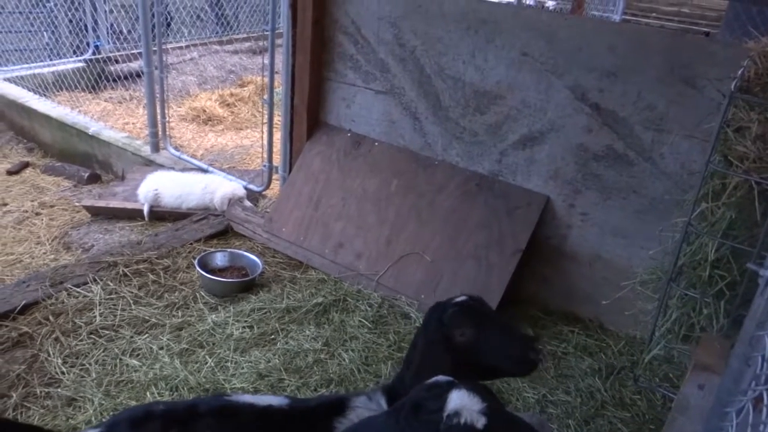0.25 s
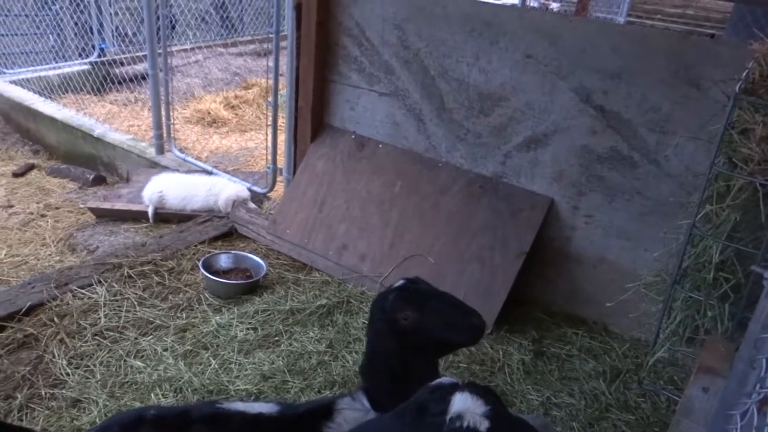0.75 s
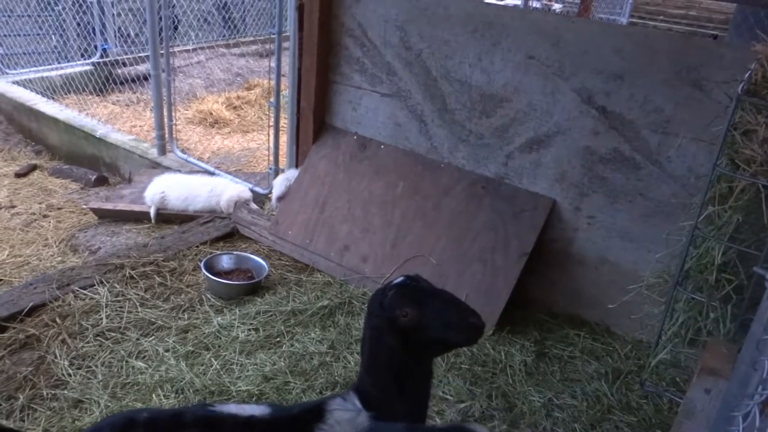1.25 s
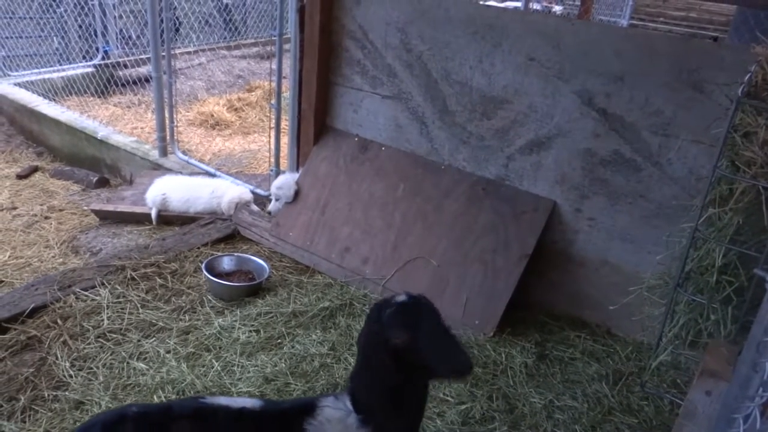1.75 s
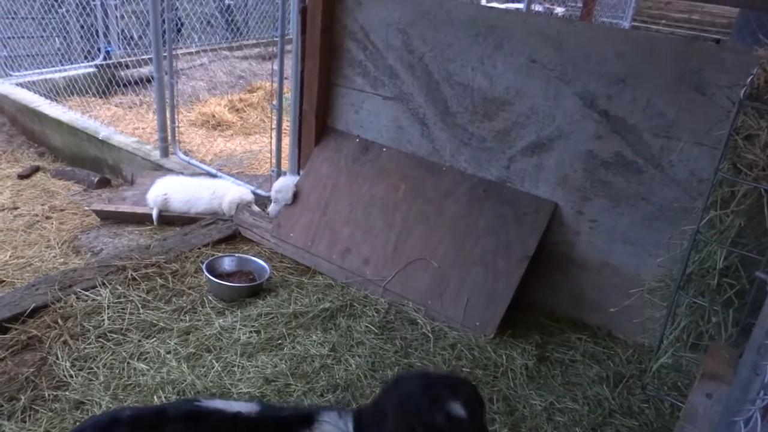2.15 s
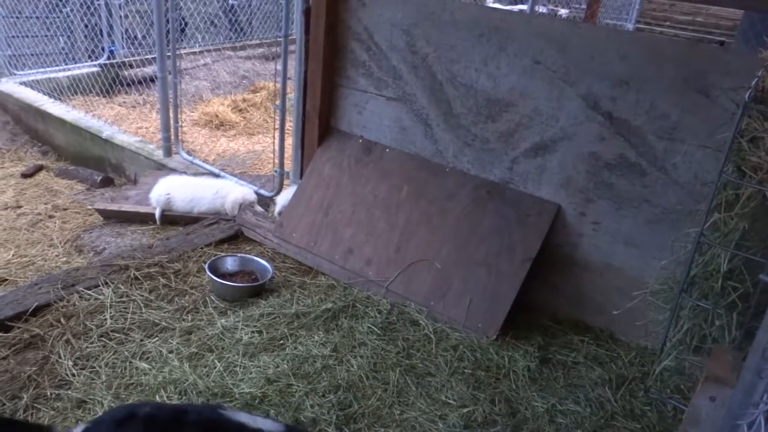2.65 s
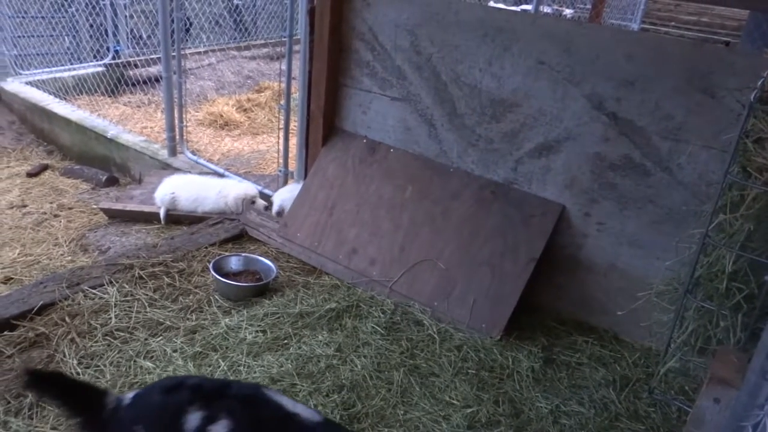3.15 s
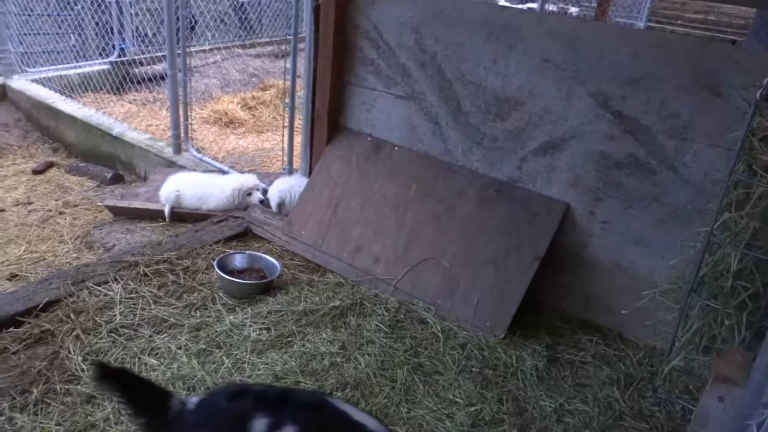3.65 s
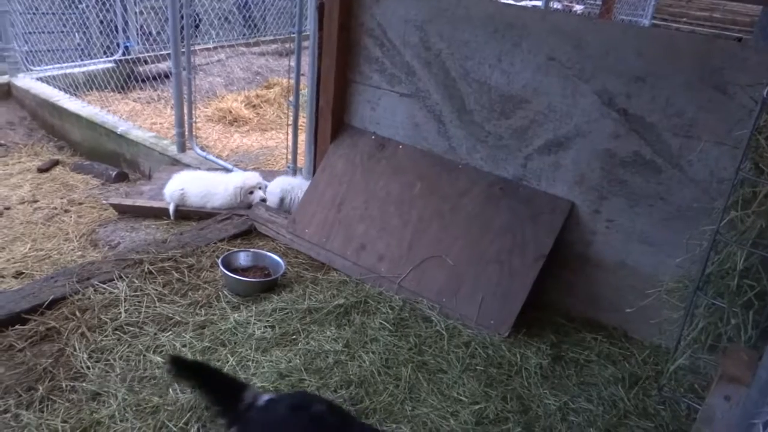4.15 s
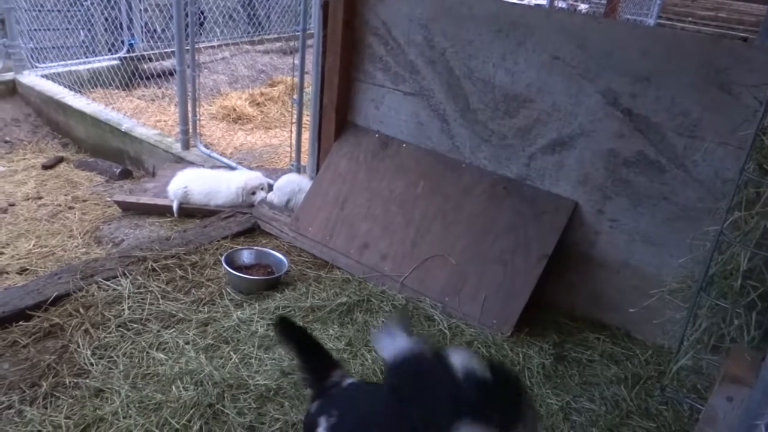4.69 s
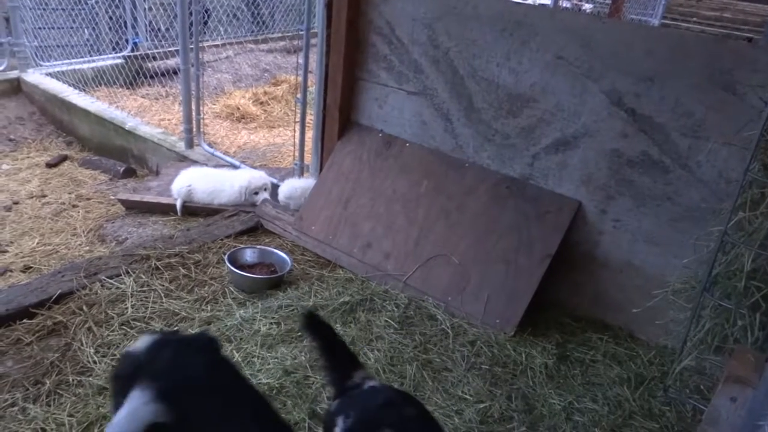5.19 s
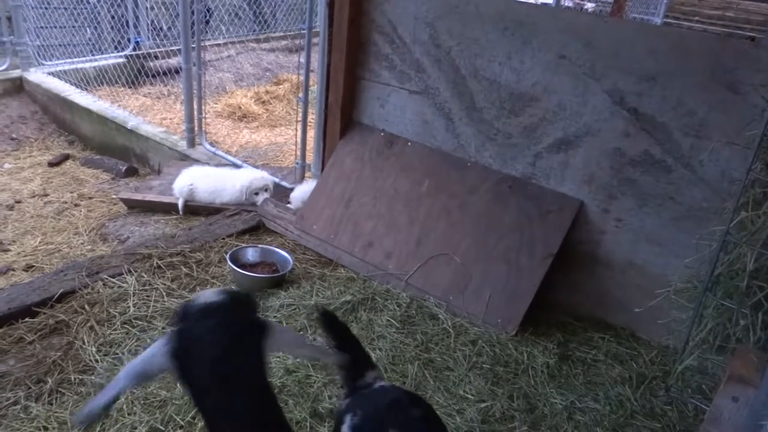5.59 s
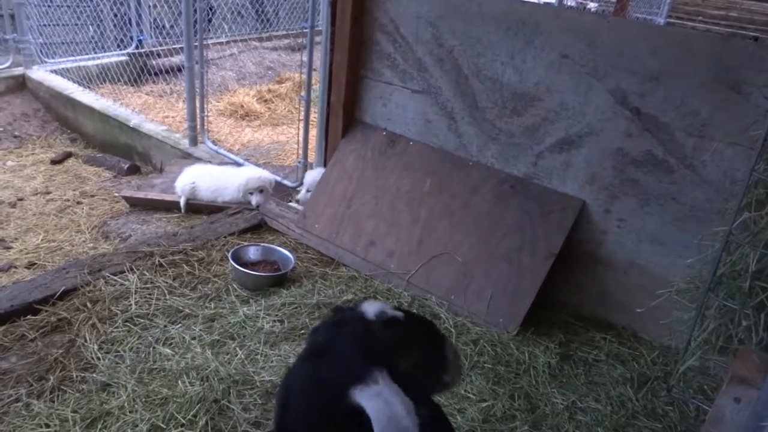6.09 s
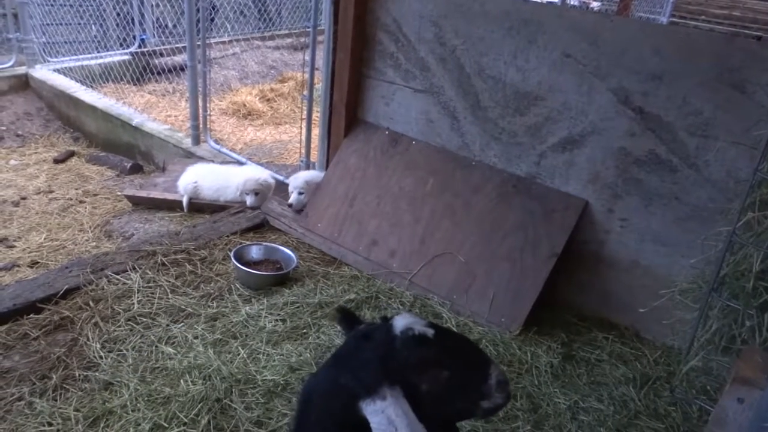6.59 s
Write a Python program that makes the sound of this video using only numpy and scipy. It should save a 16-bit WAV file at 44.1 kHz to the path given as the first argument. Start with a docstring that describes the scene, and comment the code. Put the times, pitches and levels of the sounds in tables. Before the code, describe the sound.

A dog woofs low, barks roughly in two bouts with hoarse huffs between, then a young animal cries thinly over straw rustling in a barn pen.

```python
"""First straw rustles softly over a low rumble in a barn pen; then a dog gives a low woof, three rough barks,
two hoarse huffs and two more barks: a clear tone, with pulses and puffs of air rasping in throat and mouth.
A young animal answers with one long, thin cry, a stack of harmonics that cracks and drops to a lower register.
Goats shuffle close by: snapping stalks make the straw, dull bursts the hooves, ringing modes the knocks
on the pen. Barn and yard echo the voices, and filtered noise makes the air and its rumble."""
import sys
import numpy as np
from scipy import signal
from scipy.fft import rfft, irfft, next_fast_len
from scipy.io import wavfile
from scipy.ndimage import uniform_filter1d

SR = 44100
rng = np.random.default_rng(int(sys.argv[2]) if len(sys.argv) > 2 else 0)


def materialize(psi):
    """Save the field psi as 16-bit PCM at rate SR to the path in sys.argv[1].

    A 1-D psi becomes a single channel; in a 2-D psi each row is a channel.
    """
    bounded = np.clip(np.atleast_2d(psi).T, -1, 1)
    quanta = np.round(bounded * 32767).astype(np.int16)
    wavfile.write(sys.argv[1], SR, quanta)


N = 301203
TIME = np.arange(N) / SR
CUTOFF_HZ = 11050  # top of the whole sound

# The main resonance of the dog's muzzle, and the higher one that honks as the jaws close
MUZZLE_HZ, MUZZLE_WIDTH_HZ = 434.7, 48
HONK_HZ, HONK_WIDTH_HZ = 620, 66

# Resonances of the dog's throat, mouth and teeth, levels relative: f/Hz, width/Hz, level/dB
THROAT = [(590, 9.7, -18.5), (634, 112, 6), (778.5, 50, 0.5), (1018, 33, -5.5), (1150, 66, -1.5),
          (1286, 20, -12)]
MOUTH = [(1446, 450, -0.5), (1785, 72, -0.5), (1828, 45, 4.5), (2126, 225, -6), (2432, 66, -7.5),
         (3400, 160, -15.5)]
TEETH = [(4626, 160, 0), (4860, 220, 3), (6150, 2600, -4), (7360, 670, -3.5)]


def dog(shimmer_db=5.5, rasp=5.8, gravel_db=-11, gravel_width_hz=95):
    """A clear tone over the chest note; uneven pulses and puffs of air rasp in throat and mouth."""
    pitch, chest_gain, tone_gain, throat_gain, honk_gain, mouth_gain = barking()
    jitter, rough, flutter_db = .025, 1.4, 2.5
    cycles = np.cumsum(pitch * (1 + jitter * drift(300))) / SR
    new_cycle = np.diff(np.floor(cycles), prepend=0)
    pulses = rms_one(new_cycle * from_db(shimmer_db * drift(300)))
    puffs = rms_one(rng.standard_normal(N) * (1 + np.cos(2 * np.pi * cycles)))
    # slack folds, at a low pitch or at little effort, flap more loosely than taut ones
    looseness = np.clip(210 / pitch, 1, 2) ** 2 + 2.4 / (1 + (tone_gain / from_db(-23.5)) ** 2)

    chest = chest_gain * np.sqrt(2) * np.sin(2 * np.pi * cycles) * from_db(3.5 * drift(90))
    gravel = resonate(puffs, [(MUZZLE_HZ, gravel_width_hz, 0)])
    gravel = even(butter(gravel, [310, 590], "band"))
    tone = barking_tone(pitch, cycles) + from_db(gravel_db) * looseness * gravel
    tone = tone_gain * even(tone, size=500)

    throat = resonate(pulses + rough * looseness * puffs, THROAT)
    throat = butter(butter(throat, [460, 1500], "band"), [460, 1500], "band")
    honk = resonate(pulses + puffs, [(HONK_HZ, HONK_WIDTH_HZ, 0)])
    honk = butter(honk, [520, 900], "band")
    throat = throat_gain * even(throat) + honk_gain * even(honk)

    # lips and tongue flap, so each resonance of the mouth swells and fades on its own
    hoarse = pulses + rasp * puffs
    mouth = 0
    for k, mode in enumerate(MOUTH):
        mouth = mouth + (-1) ** k * resonate(hoarse, [mode]) * from_db(flutter_db * drift(40))
    mouth = even(butter(mouth, [1200, 3300], "band"))
    teeth = even(butter(resonate(hoarse, TEETH), [3800, 8500], "band"))
    bright = mouth_gain * (mouth + from_db(-13.5) * teeth)
    return (pan(from_db(-5.5) * chest + from_db(2.1) * tone, db=-2.0)
            + pan(from_db(-3.0) * throat, db=-1.4) + pan(bright, db=-4.5))


def barking_tone(pitch, cycles, count=4):
    """The clear core of a bark: a harmonic sings out only while it passes the muzzle resonance."""
    orders = np.arange(2, count + 1)[:, None]
    gains = 1 / np.sqrt(1 + (2 * (orders * pitch - MUZZLE_HZ) / MUZZLE_WIDTH_HZ) ** 2)
    return np.sqrt(2) * np.sum(gains * np.sin(2 * np.pi * orders * cycles), axis=0)


# Every bark starts on slack folds, low and rising, then breaks up to its pitch
SLACK_HZ, SLACK_RISE_HZ_PER_S, BREAK_S = 131.87, 330, .026
# The tone takes the slack loss once when taut and twice when slack, and dips during the break
BARK_ATTACK_S, SLACK_DB, BREAK_DIP_DB = 0.046, -2, -7.5
# The tone collapses after the push and leaves a weaker tail
COLLAPSE_DB_PER_S, TAIL_DB, TAIL_DB_PER_S = 802.5, -8.5, 130
THROAT_FALL_DB_PER_S = 146
# The mouth closes from the break on; the second rate is added after the push
MOUTH_CLOSE_DB_PER_S, MOUTH_FALL_DB_PER_S = 88, 80
# The honk starts just before the tone collapses; its level is relative to the throat
HONK_DB, HONK_LEAD_S, HONK_HOLD_S = 2.5, .006, 0.03
HONK_ATTACK_S, HONK_FALL_DB_PER_S = .006, 280
# Without a push behind it the pitch wavers: share of the pitch, and changes a second
WAVER, WAVER_PER_S = .05, 35
GROWL_ATTACK_S, GROWL_FALL_DB_PER_S = 0.018, 206
# Against the growl's chest note: its own loss during a push, and the growl's tone and rasp
CHEST_LOSS_DB, GROWL_TONE_DB, GROWL_RASP_DB = -18, 1.5, -5.5

# A soft woof and five barks, levels before mixing: start t/s, slack onset lasts t/s, push lasts t/s,
# pitch f/Hz, sag after the push/(Hz/s), chest level/dB, tone level/dB, throat level/dB, mouth level/dB
BARKS = [(.468, .055, .13, 220.1, 601.9, -41.5, -38, -62, -58),
         (2.069, .065, .132, 217.3, 253, -49, -15, -22, -31),
         (2.293, .07, 0.13, 213.6, 150.6, -64, -13, -21.5, -34.5),
         (2.578, .068, .16, 216.7, 479.3, -53, -13, -24, -35.5),
         (4.103, .065, .127, 211.3, 119.8, -68, -12.5, -26, -37.5),
         (4.38, .072, 0.14, 207.6, 106, -46.5, -14.5, -26.5, -44.5)]
# The dog growls on under each bout, levels before mixing: start t/s, length t/s, chest level/dB
GROWLS = [(.49, 0.16, -52.5), (2.07, 0.76, -44), (4.11, 0.65, -44.5)]


def barking():
    """Pitch and gains of chest, tone, throat, honk and mouth: each bark is a gesture on top of the growl."""
    growl, = gestures(GROWLS, GROWL_ATTACK_S, GROWL_FALL_DB_PER_S)
    pitch, chest = np.full(N, float(SLACK_HZ)), growl
    tone, throat = from_db(GROWL_TONE_DB) * growl, from_db(GROWL_RASP_DB) * growl
    pushing, honk, mouth = 0, 0, 0
    for start, slack_s, push_s, hz, sag_hz_per_s, chest_db, tone_db, throat_db, mouth_db in BARKS:
        age = TIME - start
        after = np.maximum(age - push_s, 0)
        taut = np.clip((age - slack_s) / BREAK_S + .5, 0, 1)
        slack_pitch = SLACK_HZ + SLACK_RISE_HZ_PER_S * age
        taut_pitch = np.maximum(hz - sag_hz_per_s * after, SLACK_HZ)
        pitch = np.where(age >= 0, (1 - taut) * slack_pitch + taut * taut_pitch, pitch)

        push = swell(start, push_s, BARK_ATTACK_S, COLLAPSE_DB_PER_S)
        tail = from_db(TAIL_DB) * swell(start, push_s, BARK_ATTACK_S, TAIL_DB_PER_S)
        pushing = pushing + push
        chest = np.hypot(chest * from_db(CHEST_LOSS_DB * push), from_db(chest_db) * push * taut)
        core_db = tone_db + SLACK_DB * (2 - taut) + BREAK_DIP_DB * np.sin(np.pi * taut)
        tone = np.hypot(tone, from_db(core_db) * np.maximum(push, tail))
        throat_swell = swell(start, push_s, BARK_ATTACK_S, THROAT_FALL_DB_PER_S)
        throat = np.hypot(throat, from_db(throat_db) * throat_swell)
        honk_swell = swell(start + push_s - HONK_LEAD_S, HONK_HOLD_S, HONK_ATTACK_S, HONK_FALL_DB_PER_S)
        honk = honk + from_db(throat_db + HONK_DB) * honk_swell
        mouth_swell = swell(start, slack_s, BARK_ATTACK_S, MOUTH_CLOSE_DB_PER_S)
        mouth = mouth + from_db(mouth_db - MOUTH_FALL_DB_PER_S * after) * mouth_swell
    waver = WAVER * np.maximum(1 - pushing, 0) * drift(WAVER_PER_S)
    return pitch * (1 + waver), chest, tone, throat, honk, mouth


HUFF_ATTACK_S, HUFF_FALL_DB_PER_S = 0.049, 195
# The dog's huffs, levels before mixing: start t/s, length t/s, level/dB
HUFFS = [(2.96, 0.19, -43), (3.34, 0.066, -48)]
# Their colour, relative: f/Hz, level/dB per Hz
HUFF_COLOUR = [(290, 7.5), (500, -2.5), (575, -1), (692, -11), (759, 0), (1100, -1), (1470, -4.5),
               (1830, 0.5), (3470, -13), (3850, -19.5), (8000, -14.5), (10400, -41), (17600, -120)]


def huff():
    """Air forced through the dog's open mouth, with no voice."""
    gain, = gestures(HUFFS, HUFF_ATTACK_S, HUFF_FALL_DB_PER_S)
    return from_db(1.0) * gain * hiss(HUFF_COLOUR) * from_db(1.62 * drift(90))


CRY_MAIN_HZ = 1070  # main resonance
CRY_RASP, CRY_DOUBLING = 0.08, .25  # steady rasp 0-1; period doubling per unit of rasp
# The melody of the cry in its two registers: t/s, pitch f/Hz
CRY_HIGH = [(4.8, 556), (4.878, 670.3), (4.962, 723.3), (5.026, 739), (5.124, 709), (5.2, 708.3),
            (5.225, 703)]
CRY_LOW = [(5.23, 614), (5.242, 581), (5.262, 549.6), (5.44, 515.4), (5.5, 521), (5.56, 540.7),
           (5.704, 532.1), (5.818, 538.7), (5.968, 531.7), (6.09, 507.7), (6.154, 442), (6.176, 435),
           (6.19, 407.1)]
# Effort of the cry, before mixing: t/s, level/dB
CRY_EFFORT = [(4.801, -52.5), (4.95, -48), (5.1, -44.5), (5.25, -37.5), (5.45, -38.5), (5.898, -36.5),
              (6.02, -44), (6.1, -40.5), (6.19, -57)]
# The mouth opens and closes again: t/s, treble an octave above the main resonance level/dB
CRY_MOUTH = [(4.8, -11), (4.92, 4), (5.49, -1), (5.6, -10.5), (6.0, -12), (6.19, -11.5)]
# The young animal's throat, relative: f/Hz, level/dB
CRY_THROAT = [(530, -8), (715, 2), (900, -1), (1070, 3.5), (1250, -7.5), (1430, -1.5), (1600, -1),
              (2140, 2), (2630, -5.5), (2880, -3), (3200, -11.5), (3500, -12), (3700, -20), (3950, -10),
              (4400, -22.5), (5000, -28)]
# Standing waves between the walls swallow or lift a harmonic gliding through: f/Hz, width/Hz, level/dB
STANDING_WAVES = [(1041, 8.7, -17.5), (2080, 10.5, 8)]
# The cry cracks: t/s, half length t/s, added rasp 0-1
CRACKS = [(5.101, 0.039, 0.65), (5.193, 0.023, 0.3), (5.234, 0.015, 0.68), (6.15, 0.049, 0.43)]


def cry(melody, jitter=0.0026, rasp_jitter=0.018, waver_db=2.6, count=8):
    """A nearly pure voice, brighter as the mouth opens; in a crack it screeches and alternate cycles weaken."""
    span = during(melody) > 0
    pitch, effort_db, mouth_db = (in_time(rows)[0][span] for rows in (melody, CRY_EFFORT, CRY_MOUTH))
    rasp = CRY_RASP
    for s, half_s, depth in CRACKS:
        rasp = rasp + depth * np.exp(-((TIME[span] - s) / half_s) ** 2)
    unsteady_pitch = pitch * (1 + (jitter + rasp_jitter * rasp) * drift(350)[span])
    phase = 2 * np.pi * np.cumsum(unsteady_pitch) / SR

    voice = 0
    for k in range(1, count + 1):
        hz = k * pitch
        opening_db = mouth_db * np.sqrt(np.maximum(np.log2(hz / CRY_MAIN_HZ), 0))
        walls_db = sum(db / (1 + ((hz - centre) / width) ** 2) for centre, width, db in STANDING_WAVES)
        level_db = at_hz(CRY_THROAT, hz) + opening_db + walls_db + waver_db * drift(25)[span]
        voice = voice + np.sqrt(2) * from_db(level_db) * np.sin(k * phase)
    # half the pitch makes every second cycle weaker
    voice = voice * (1 + CRY_DOUBLING * rasp * np.sin(phase / 2))
    voice = voice * (1 + .5 * rasp * drift(700)[span])
    screech = rms_one(butter(rng.standard_normal(len(pitch)), [1700, 3100], "band"))
    screech = from_db(mouth_db) * rasp * screech
    out = np.zeros(N)
    out[span] = from_db(effort_db) * (voice + screech)
    return during(melody) * out


STRIDE_ATTACK_S, STRIDE_FALL_DB_PER_S = .035, 165
SHUFFLE_SWING_DB, SHUFFLE_PER_S, SHUFFLE_CRUSH_DB = 1.2, 14, -3
# Legs sweep through the straw, before mixing: start t/s, length t/s, brushing level/dB, crushing level/dB
STRIDES = [(.08, 0.035, -61, -76), (.28, 0.023, -59, -60), (.48, 0.085, -55, -61), (.68, 0.091, -56, -60),
           (.8, 0.12, -45, -52), (.98, .32, -52, -59.5), (1.53, 0.049, -50.5, -63), (1.85, 0.15, -59, -88),
           (2.0, .07, -52, -66), (2.09, 0.064, -46, -52), (2.3, .06, -53, -65), (2.58, 0.081, -55, -80),
           (3.2, 0.094, -60.5, -56.5), (3.52, 0.11, -58, -66), (3.85, 0.053, -51, -50.5),
           (3.96, 0.068, -52, -47.5), (4.14, 0.17, -57.5, -79), (4.45, 0.11, -52, -61),
           (4.8, 0.086, -60, -71), (5.14, 0.061, -51.5, -70), (5.37, 0.12, -50.5, -71),
           (5.73, 0.06, -57.5, -61), (6.17, 0.084, -50, -60), (6.31, 0.15, -56, -80),
           (6.48, 0.11, -53, -67), (6.68, 0.052, -57, -59)]
# Small shuffling between the strides, before mixing: t/s, level/dB
SHUFFLE = [(0, -69), (1.3, -55.5), (1.75, -72), (2.3, -63.5), (3.6, -59.5), (5.5, -60.5), (5.95, -66),
           (6.5, -53.5), (6.83, -68)]
# Colours of brushing and crushing, relative: f/Hz, level/dB per Hz
SWISH_COLOUR = [(1500, -21), (3000, -12.5), (5000, -10.5), (7000, -6), (8600, -3), (9600, -7.5),
                (11000, -18)]
CRUSH_COLOUR = [(150, -24.5), (280, 3), (600, 15), (1300, 7), (2200, 8.5), (3400, 6), (5000, 8.5),
                (7000, -3.5), (10000, -1.5)]


def straw():
    """Light brushing is thin and high; a hoof's weight crushes the stalks with a fuller sound."""
    brushing, crushing = gestures(STRIDES, STRIDE_ATTACK_S, STRIDE_FALL_DB_PER_S)
    shuffle = from_db(in_time(SHUFFLE)[0] + SHUFFLE_SWING_DB * drift(SHUFFLE_PER_S))
    swish = np.hypot(brushing, shuffle)
    crush = np.hypot(crushing, from_db(SHUFFLE_CRUSH_DB) * shuffle)
    thin = crackle(SWISH_COLOUR, per_s=4000, spread_db=2.2, smooth=1.0)
    full = crackle(CRUSH_COLOUR, per_s=2500, spread_db=2.2, smooth=1.0)
    return from_db(2.0) * swish * thin + from_db(1.0) * crush * full


# Hooves on the bedding, peaks before mixing: t/s, level/dB, thud f/Hz
STEPS = [(0.757, -39.5, 623), (0.807, -37, 301), (.85, -47, 332), (0.926, -43.5, 260), (1.082, -48.5, 262),
         (2.013, -43.5, 376.3), (6.33, -50.5, 148)]


def hooves():
    """Each step is a dull thud in the bedding: a burst of noise through one broad resonance."""
    out = 0
    for s, db, hz in STEPS:
        thud = butter(resonate(burst(s, decay_s=0.087), [(hz, 130, 0)]), 1700, "low")
        out = out + from_db(db) * thud / np.abs(thud).max()
    return out


# Knocks against the pen, before a 4 dB lift: t/s, level/dB
KNOCKS = [(3.871, -49.5), (4.006, -36.5), (6.748, -54)]
# The pen's modes, levels relative: f/Hz, level/dB, ring setting t/s
# (the setting is held to 0.05-0.5 s; a mode takes about 3.6 times as long to fall by 60 dB)
PEN = [(590, -1.5, .4), (1260, -10, 0.15), (1316, -14, 0.04), (1772.7, -19, 0.08), (2140, -27, 0.063),
       (2670, -27, 0.16), (3025, -22, 0.04)]


def knocks(scuff_db=-9):
    """A scuffing contact sets the modes of the pen ringing."""
    modes = [(hz, 0.61 / np.clip(ring_s, .05, .5), level) for hz, level, ring_s in PEN]
    out = 0
    for s, db in KNOCKS:
        ring = resonate(burst(s, decay_s=0.0053), modes)
        scuff = butter(burst(s, decay_s=0.025), [450, 2600], "band")
        knock = ring / np.abs(ring).max() + from_db(scuff_db) * scuff / np.abs(scuff).max()
        out = out + from_db(db + 4.0) * knock
    return out


# How fast the barn's echo dies: f/Hz, time to fall by 60 dB t/s
BARN_T60 = [(150, 0.48), (450, 0.089), (1200, 0.24), (3000, 0.41), (9000, 0.2)]


def barn(barks, young):
    """Both voices ring in the barn."""
    sent = from_db(-6.5) * barks.mean(axis=0) + from_db(-11) * young
    return reverb(sent, BARN_T60, width=0.39, onset_s=0.0052)


# How fast the yard's echo dies: f/Hz, time to fall by 60 dB t/s
YARD_T60 = [(150, 1.1), (450, 2.07), (1200, 4.8), (3000, 0.22), (9000, .2)]


def yard(barks):
    """The barks echo, late and faint, across the yard."""
    return reverb(from_db(-23.5) * barks.mean(axis=0), YARD_T60, width=0.083, onset_s=0.062)


AIR_DB, RUMBLE_SWING_DB = -57.5, 4.5
# Colours of the yard's air and of the low rumble, relative: f/Hz, level/dB per Hz
AIR_COLOUR = [(15, -28), (25, -5.5), (59, -8.5), (121, -2.5), (192, -11.5), (247, -0.5), (288, -3),
              (559, -9), (759, -11.5), (1470, -23), (5820, -26), (7900, -17), (11000, -50.5), (14300, -42),
              (22000, -120)]
RUMBLE_COLOUR = [(25, -12), (60, -10.5), (120, -4), (200, -4), (400, -24.5)]
# Low rumble, before its slow swing: t/s, level/dB
RUMBLE = [(0, -64.5), (1.6, -65.5), (2.8, -55.5), (3.4, -57), (3.95, -62.5), (4.65, -47.5), (5.0, -66),
          (6.83, -58.5)]


def air():
    """Steady noise is the air of the yard; low noise that slowly swells and fades is the rumble."""
    rumble_db = in_time(RUMBLE)[0] + RUMBLE_SWING_DB * drift(1.8)
    return from_db(AIR_DB) * hiss(AIR_COLOUR) + from_db(rumble_db) * hiss(RUMBLE_COLOUR)


def from_db(db):
    """Decibels to gain."""
    return 10 ** (np.asarray(db) / 20)


def rms_one(x):
    """Scale to rms 1."""
    return x / np.sqrt(np.mean(x ** 2) + 1e-20)


def in_time(rows):
    """Each column of a curve, sample by sample."""
    s, *columns = np.transpose(rows)
    return [np.interp(TIME, s, c) for c in columns]


def during(rows, fade=0.005):
    """1 while a curve lasts, with short fades."""
    return np.clip(np.minimum(TIME - rows[0][0], rows[-1][0] - TIME) / fade + .5, 0, 1)


def at_hz(points, hz):
    """Read a spectrum on a log-frequency axis."""
    f, value = np.transpose(points)
    return np.interp(np.log(np.maximum(hz, 1)), np.log(f), value)


def butter(x, hz, kind):
    """Second-order Butterworth filter."""
    return signal.sosfilt(signal.butter(2, hz, kind, fs=SR, output="sos"), x + 1e-18)


def drift(rate):
    """Smooth chance of spread 1 that changes about rate times a second."""
    knots = rng.standard_normal(20000)
    return rms_one(np.interp(TIME * rate, np.arange(len(knots)), knots))


def swell(start, length, attack_s, fall_db_per_s):
    """Gain of one gesture: it rises, holds to the end of its length and dies away."""
    age = TIME - start
    fall_db = np.clip(fall_db_per_s * (age - length), 0, 200)
    return np.clip(age / attack_s, 0, 1) ** 2 * from_db(-fall_db)


def gestures(rows, attack_s, fall_db_per_s):
    """Gain of each dB column over a table of (start, length, dB, ..) gestures of one shape."""
    power = 0
    for s, length, *dbs in rows:
        power = power + (from_db(dbs)[:, None] * swell(s, length, attack_s, fall_db_per_s)) ** 2
    return np.sqrt(power)


def burst(s, decay_s):
    """A short rush of contact noise."""
    age = np.maximum(TIME - s, 0)
    return rng.standard_normal(N) * (1 - np.exp(-age / 0.00074)) * np.exp(-age / decay_s)


def resonate(x, modes):
    """Parallel resonances (Hz, width, dB) with alternating signs."""
    out = 0
    for k, (hz, width, db) in enumerate(modes):
        r = np.exp(-np.pi * width / SR)
        poles = [1, -2 * r * np.cos(2 * np.pi * hz / SR), r * r]
        ring = signal.lfilter([1, 0, -1], poles, x + 1e-18) * (1 - r * r) / 2
        out = out + (-1) ** k * from_db(db) * ring
    return out


def even(x, size=900):
    """Hold the short-time rms at 1."""
    power = uniform_filter1d(uniform_filter1d(x * x, size), size)
    return x / np.sqrt(np.maximum(power, 1e-14))


def pan(x, db):
    """Place a sound with the given left-right difference."""
    return x * from_db([[db / 2], [-db / 2]])


# How alike left and right are: f/Hz, likeness 0-1 (held to 0.99 at most)
LIKENESS = [(40, 1), (300, 0.86), (1000, 0.39), (3000, 0.69), (8000, 0.86), (11000, .7)]


def coloured(mid, side, colour):
    """Give two unrelated signals a spectrum and mix them to left and right; rms 1."""
    size = next_fast_len(N)
    hz = np.fft.rfftfreq(size, 1 / SR)
    alike = np.clip(at_hz(LIKENESS, hz), 0, .99)
    low_cut = np.minimum(hz / colour[0][0], 1) ** 2
    gain = from_db(at_hz(colour, hz)) * (hz < CUTOFF_HZ) * low_cut
    both = np.sqrt(1 + alike) * rfft(mid, size) + np.sqrt(1 - alike) * rfft(side, size) * [[1], [-1]]
    return rms_one(irfft(gain * both, size)[:, :N])


def hiss(colour):
    """Smooth stereo noise."""
    return coloured(*rng.standard_normal((2, N)), colour)


def crackle(colour, per_s, spread_db, smooth):
    """Stalks snap in clumps, each with a size of its own, over the smooth sound of their rubbing."""
    sizes = from_db(spread_db * np.minimum(rng.exponential(1, N), 4.5))
    snaps = sizes * (rng.random(N) < per_s * from_db(3 * drift(60)) / SR)
    return coloured(*(rng.standard_normal((2, N)) * (rms_one(snaps) + smooth)), colour)


def reverb(x, t60s, width, onset_s):
    """Diffuse stereo echo, at most 1.5 s long: every octave or so dies at its own rate."""
    t = TIME[:int(1.5 * SR)]
    edges = np.geomspace(80, 12000, 8)
    tail = 0
    for low, high in zip(edges, edges[1:]):
        band = butter(rng.standard_normal((2, len(t))), [low, high], "band")
        tail = tail + band * from_db(-60 * t / at_hz(t60s, np.sqrt(low * high)))
    onset = np.clip(t / onset_s - .5, 0, 1)
    mid, side = tail * onset * np.sqrt(np.log(1e6) / (SR * at_hz(t60s, 350)))
    return signal.fftconvolve([x], [mid + width * side, mid - width * side], axes=1)[:, :N]


def scene():
    """The voices ring in the barn and the barks echo across the yard; straw and hooves are close."""
    barks = dog()
    young = cry(CRY_HIGH) + cry(CRY_LOW)
    voices = barks + pan(from_db(-3.5) * young, db=-3.5)
    around = barn(barks, young) + yard(barks) + huff() + hooves() + knocks()
    return voices + pan(around, db=1.5) + pan(straw(), db=-0.8) + air()


def record(dry):
    """The top is cut steeply."""
    return signal.sosfilt(signal.ellip(12, .1, 80, CUTOFF_HZ, fs=SR, output="sos"), dry)


dry = scene()
out = record(dry)
materialize(out)
```